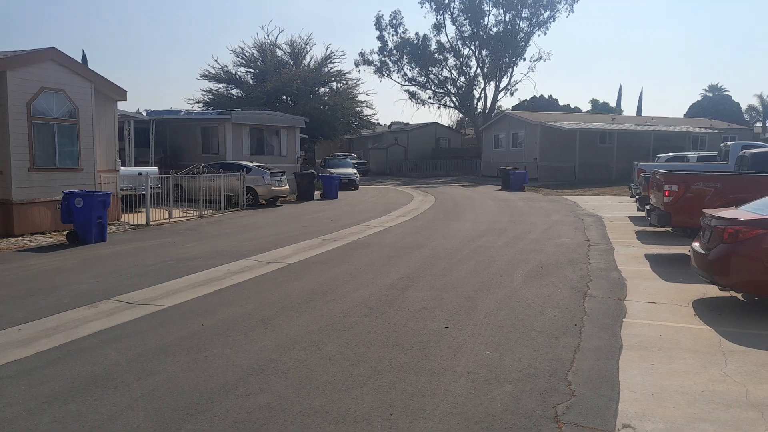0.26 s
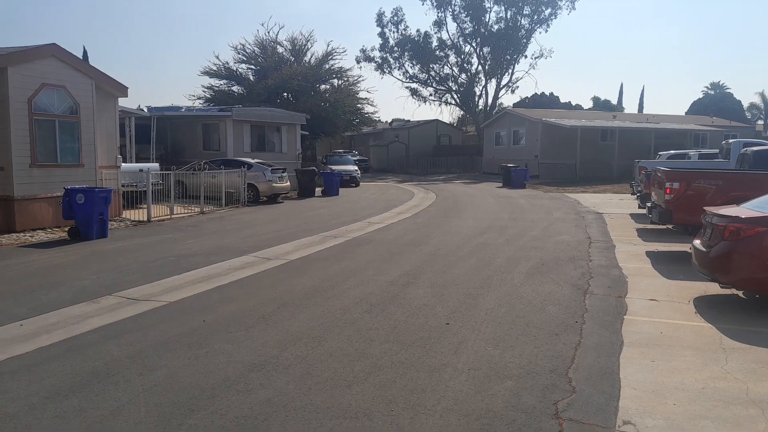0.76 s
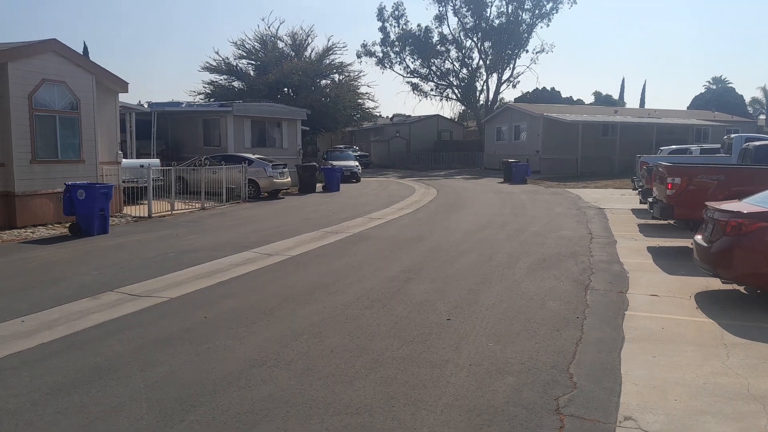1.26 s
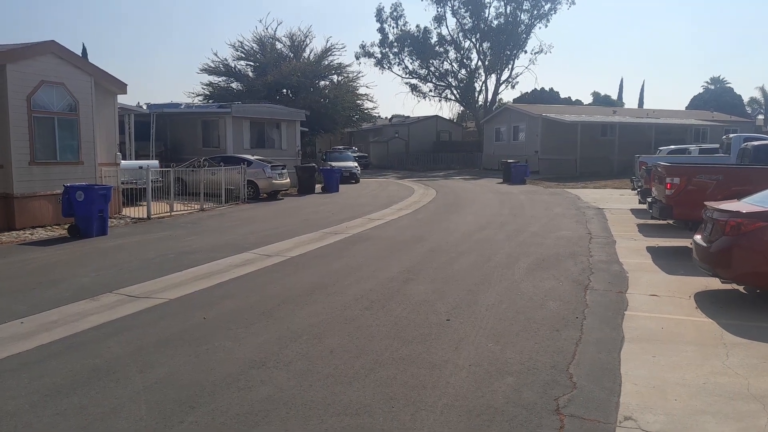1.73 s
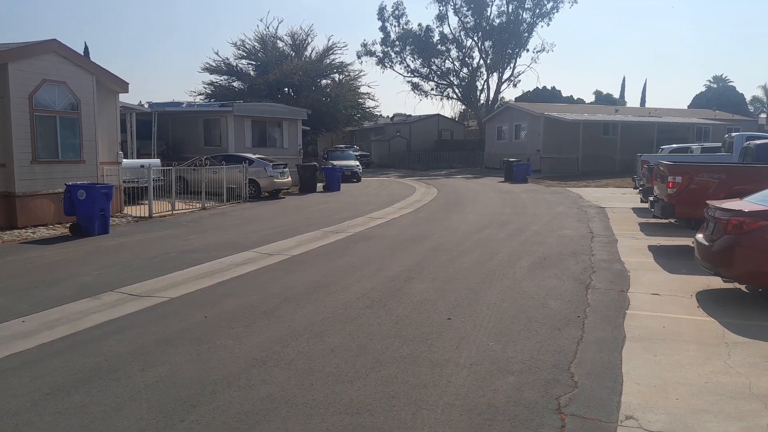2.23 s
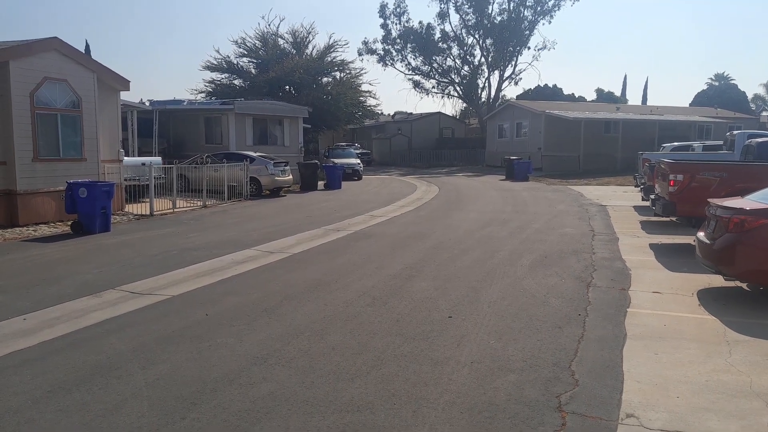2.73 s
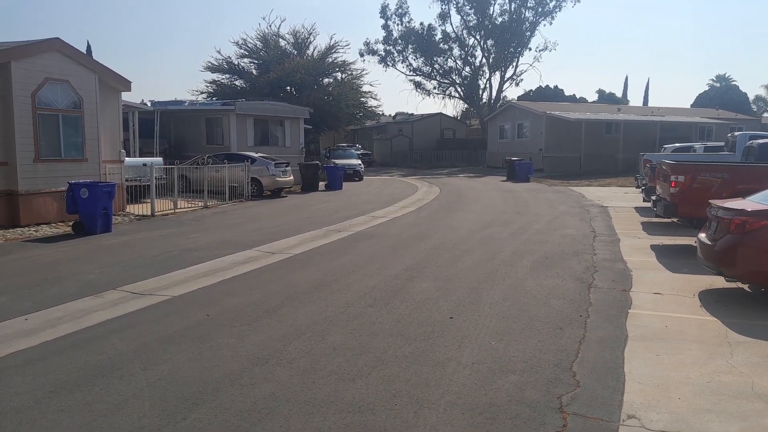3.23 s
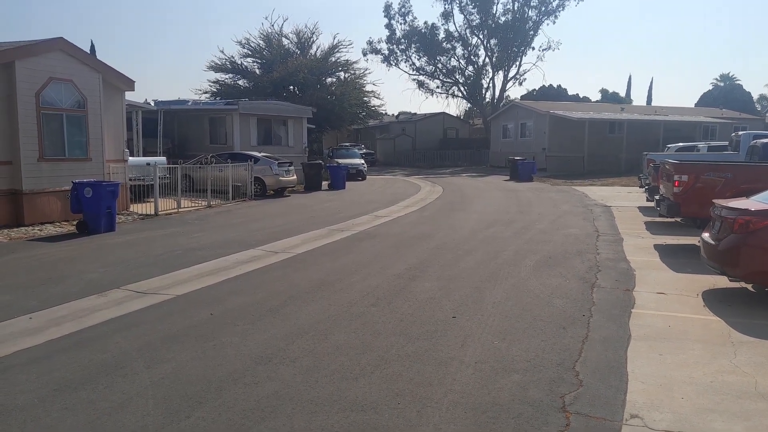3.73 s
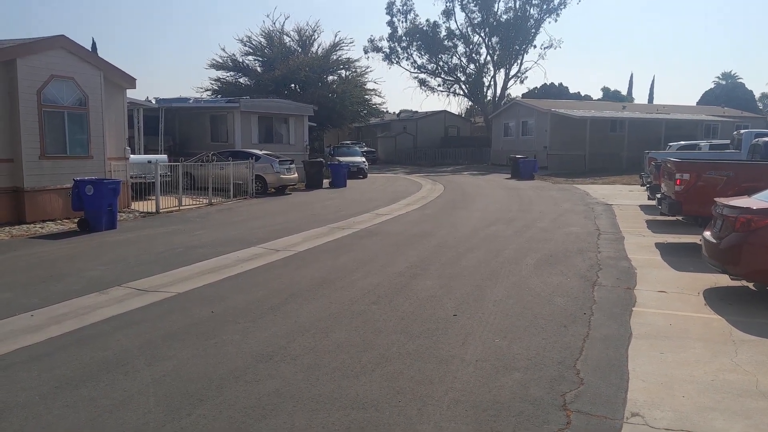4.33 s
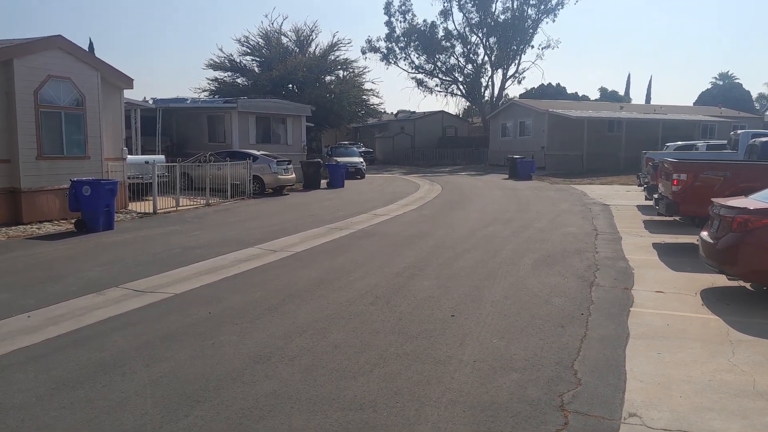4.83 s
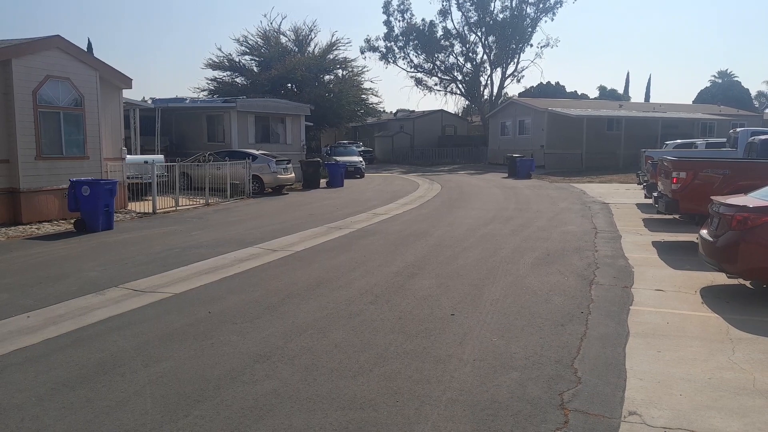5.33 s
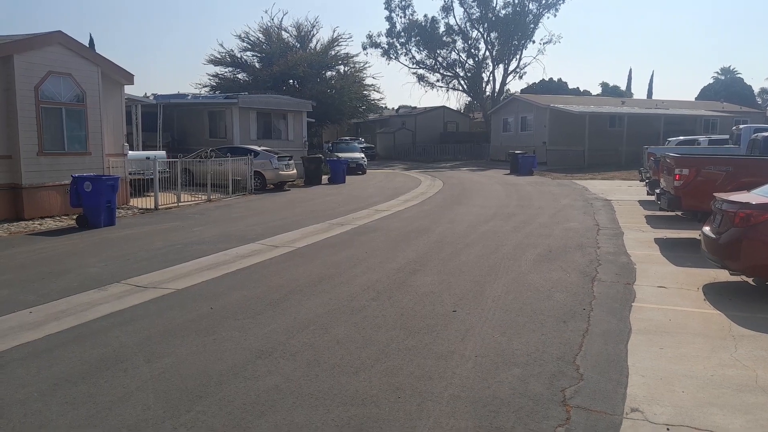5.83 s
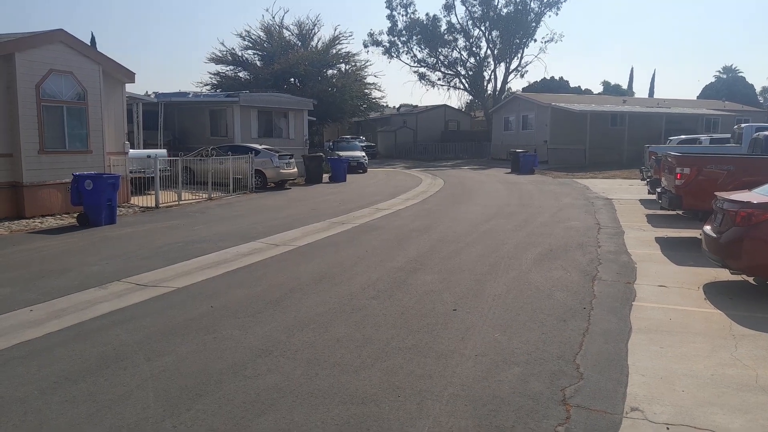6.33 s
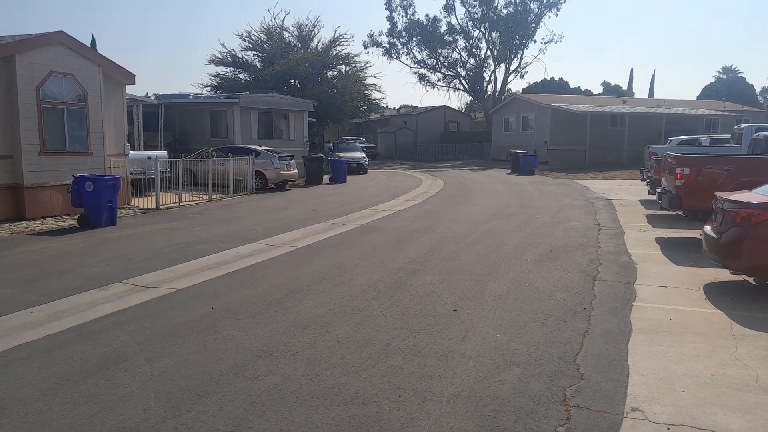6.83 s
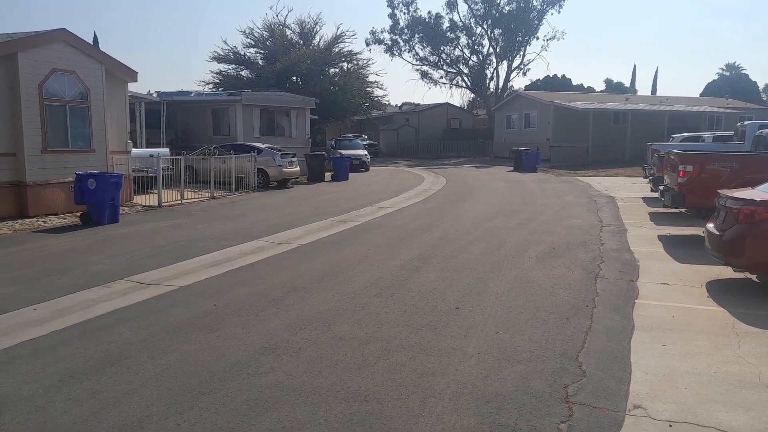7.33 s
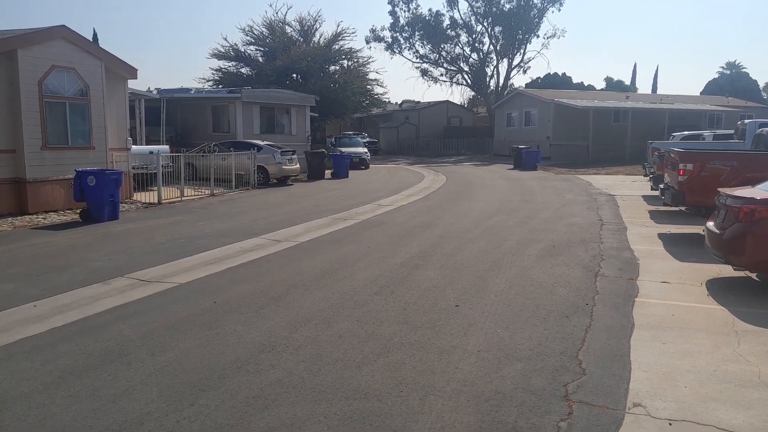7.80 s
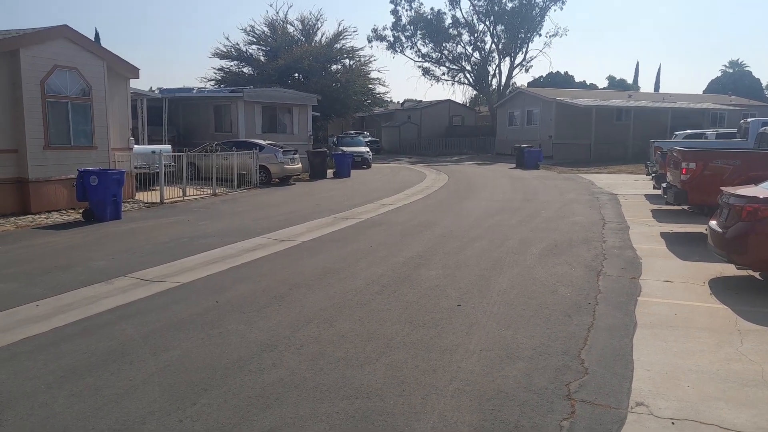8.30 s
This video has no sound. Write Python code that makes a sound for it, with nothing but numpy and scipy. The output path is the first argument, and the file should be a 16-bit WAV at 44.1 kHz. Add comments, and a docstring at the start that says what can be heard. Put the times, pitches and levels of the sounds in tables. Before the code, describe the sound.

On a quiet residential street, a heavy diesel truck drones some distance away, low and throbbing with clatter, fan hum and faint high squeals. Its pitch sags until 0.6 seconds, then revs up to a peak near 1.3. From 1.3 to about 2.1 a loud two-tone horn, a minor third apart, stutters seven toots about 0.12 seconds apart, buzzy and echoing from house fronts; a thin squeal near 2 kHz accompanies it. The engine coasts down to a chugging low around 2.6, then pulls up sharply by 3.0 and holds. Close, soft scuffs and gritty rustles appear around 0.5, 1.1 and 2.5 to 4.5. After 4.2 the truck turns and leaves, rumble and hiss easing while engine pitch and gear whine climb steadily to the end at 8.6. Small birds chirp from 4.8 onward, with a tiny squeal and scuff near 8.1.

```python
"""A diesel drones some way down a residential street while brakes squeal thinly: a refuse truck revs once,
coasts down, then pulls away, turns and gathers speed. Tones and noise locked to the firing phase make its
exhaust, fan and clatter; narrow noise bands make gears, turbo whine and squeals. A two-tone horn of wavering
partials stutters seven times between the houses. Close by, shaped noise makes a few soft scuffs; small birds
chirp in sliding noise bands."""
import sys
import numpy as np
from scipy import signal
from scipy.fft import rfft, irfft, next_fast_len
from scipy.io import wavfile
from scipy.ndimage import uniform_filter1d, map_coordinates

SR = 44100
rng = np.random.default_rng(int(sys.argv[2]) if len(sys.argv) > 2 else 0)


def store_wav(level_fs):
    """Save 16-bit WAV to argv[1]."""
    pcm = np.round(np.clip(np.atleast_2d(level_fs), -1, 1) * 32767)
    wavfile.write(sys.argv[1], SR, pcm.T.astype(np.int16))


N = 377496
TIME = np.arange(N) / SR

# horn toots: start [t/s], relative level [dB]
HORN_TOOTS = [(1.297, 2), (1.416, 1.5), (1.534, 1), (1.653, 1.5), (1.772, 0.5), (1.889, 2), (2.009, 1)]
# horn's upper partials, also the spectrum of its noise: [f/Hz], level before trim [dB]
HORN_BUZZ = [(3600, -53), (5000, -56.5), (6000, -63.5), (6800, -70), (9500, -67), (11500, -78),
             (13500, -75), (15700, -79)]


def amp(db):
    """Decibels to gain."""
    return 10 ** (np.asarray(db) / 20)


def unit(x):
    """Scale to rms 1."""
    return x / np.sqrt(np.mean(x ** 2) + 1e-20)


def along(points, hz):
    """Interpolate (f/Hz, value) points on a log frequency axis."""
    f, v = np.transpose(points)
    return np.interp(np.log(hz + 1), np.log(f + 1), v)


def curves(rows):
    """One value per sample for each column after the time."""
    s, *cols = np.transpose(rows)
    return [np.interp(TIME, s, c) for c in cols]


def wobble(rate_hz, size=N):
    """A smooth random curve, rate_hz knots a second."""
    steps = np.arange(0, size * rate_hz / SR + 1, 1 / 10)
    knots = rng.standard_normal(int(steps[-1]) + 3)
    return np.interp(TIME[:size] * rate_hz, steps, map_coordinates(knots, [steps]))


def swell(peak_s, half_s):
    """A bell of height 1 around a moment."""
    return np.exp(-((TIME - peak_s) / half_s) ** 2)


def later(x, delay_s):
    """x after a delay."""
    return np.roll(x, int(max(delay_s, 0) * SR), axis=-1)


def filtered(x, response):
    """x times a response of frequency."""
    m = next_fast_len(N + SR // 2)
    return irfft(rfft(x, m) * response(np.fft.rfftfreq(m, 1 / SR)), m)[..., :N]


def angle(hz):
    """Running phase of a frequency curve."""
    return 2 * np.pi * np.cumsum(hz) / SR


def tone(phase):
    """A sine of rms 1 at a random starting phase."""
    return np.sqrt(2) * np.sin(phase + rng.uniform(0, 2 * np.pi))


def fuzzy(hz, width_hz):
    """A narrow stereo noise band of rms 1 around a moving pitch."""
    smooth = signal.butter(2, width_hz / 2, fs=SR, output="sos")
    a, b = signal.sosfilt(smooth, rng.standard_normal((2, 2, len(hz))))
    return unit(a * np.cos(angle(hz)) + b * np.sin(angle(hz)))


def glides(rows, width_hz):
    """Short whistles that swell, slide in pitch and fade."""
    out = np.zeros((2, N + SR))
    for s, length_s, start_hz, end_hz, db in rows:
        u = np.linspace(0, 1, int(length_s * SR))
        band = fuzzy(start_hz + (end_hz - start_hz) * u, width_hz)
        out[:, int(s * SR):][:, :len(u)] += amp(db + 6) * np.sin(np.pi * u) * band
    return out[:, :N]


def rush(spectrum):
    """Stereo noise of rms 1; the sides grow less alike in the treble and mostly lean left."""
    # [f/Hz], left-right correlation [1]
    alike = [(60, 0.93), (290, 0.99), (640, 0.71), (1400, 0.47), (3100, 0.34), (6800, 0.041)]
    # [f/Hz], left minus right [dB]
    side_lean = [(60, -1), (110, 1.5), (200, 0.5), (380, 1.5), (700, 3.5), (1290, 5), (2380, 3), (4400, 1),
                 (8120, -2.5), (15000, 0.5)]
    m = next_fast_len(N, real=True)
    hz = np.fft.rfftfreq(m, 1 / SR)
    turn = np.arccos(np.clip(along(alike, hz), -1, 1)) / 2
    shaped = rfft(rng.standard_normal((2, m))) * amp(along(spectrum, hz))
    mid, side = shaped * [np.cos(turn), np.sin(turn)]
    lean = amp(along(side_lean, hz) / 2)
    return unit(irfft([(mid + side) * lean, (mid - side) / lean], m)[:, :N])


def throb(phase, depth):
    """A gain of rms 1 that peaks once a cycle."""
    return unit(np.exp(depth * np.cos(phase)))


def street(x):
    """Scattered sound from houses and trees; the high treble dies first."""
    # reverberation: [f/Hz], t60 [s]
    decay = [(200, 1.6), (1500, 0.59), (2400, 1.1), (2900, 1.35), (4000, 0.31), (6000, 0.13),
             (12000, 0.038)]
    hz, t, z = signal.stft(rng.standard_normal((2, SR)), SR, nperseg=256)
    t60_s = np.maximum(along(decay, hz), .02)[:, None]
    tail = signal.istft(z * amp(-60 * t / t60_s), SR, nperseg=256)[1]
    return signal.fftconvolve(x, tail / np.linalg.norm(tail[0]), axes=1)[:, :N]


def air():
    """The quiet air of the street: steady shaped noise."""
    # [f/Hz], relative density [dB per Hz]
    spectrum = [(30, 18.5), (200, 21.5), (1000, 15.5), (4000, 7), (7000, 4), (11000, -5.5), (15700, -6)]
    return amp(-65.0) * rush(spectrum)


def birds():
    """Chirps as sliding noise bands, with their scatter from the street."""
    # start [t/s], length [s], start and end [f/Hz], level 6 dB under mid-glide [dB]
    chirps = [(4.76, 0.056, 4600, 3806, -77), (5.03, .11, 4200, 2614, -68), (5.41, 0.11, 3995, 3900, -71.5),
              (5.44, 0.15, 4670, 4030, -68), (5.54, .11, 3880, 2770, -65.5),
              (5.73, 0.059, 5396, 4907, -73.5), (6.04, 0.075, 3920, 3195, -67.5),
              (6.29, .03, 5200, 4240, -67), (6.9, 0.065, 4415, 3062, -66), (6.93, 0.08, 4270, 2955, -67),
              (7.17, .07, 3892, 3300, -69.5), (7.32, 0.086, 5520, 5020, -71), (8.38, .11, 3800, 2762, -64),
              (8.48, 0.067, 3593, 3883, -65)]
    calls = glides(chirps, width_hz=320)
    return calls + amp(-8.0) * street(calls)


def coasting():
    """1 while the foot is off the pedal, 0 under power."""
    # foot off the pedal: from [t/s], to [t/s]
    spans = [(.37, 0.726), (1.89, 2.66)]
    pedal_s = 0.076  # time to lift or press
    return sum(np.clip(np.minimum(TIME - start, end - TIME) / pedal_s + .5, 0, 1) for start, end in spans)


def pulling(firing_hz):
    """1 while the engine climbs hard from idle, 0 at steady speed."""
    full_pull_hz_per_s, ends_hz, fade_hz = 30, 57.8, 6
    climb_hz_per_s = uniform_filter1d(np.gradient(firing_hz) * SR, size=SR // 8)
    return np.clip(climb_hz_per_s / full_pull_hz_per_s, 0, 1) * np.clip((ends_hz - firing_hz) / fade_hz, 0, 1)


def level(law, firing_hz):
    """A layer's dB: it rises with speed, shifts with coasting or pulling and falls as the truck leaves."""
    # the truck turns and leaves: [t/s], level [dB]
    leaving = [(4.2, 2), (4.75, -4), (6.3, -7), (8.56, -10)]
    cruise_hz = 60  # firing rate
    cruise_db, octave_db, share, coast_db, pull_db = law
    away_db, = curves(leaving)
    effort_db = coast_db * coasting() + pull_db * pulling(firing_hz)
    return cruise_db + octave_db * np.log2(firing_hz / cruise_hz) + share * away_db + effort_db


def hiss_and_rustles(firing_hz):
    """The engine's airy hiss and soft gritty rustles: one noise whose powers add."""
    # cruise level before trim [dB], slope [dB/octave of speed], share of leaving loss [1],
    # coasting [dB], pulling [dB]
    law = (-61.5, 22.5, 1.44, -0.5, 0.5)
    # peak [t/s], half length [s], level before trim [dB]
    rustles = [(0.315, 0.031, -66), (.555, 0.04, -58), (1.04, 0.05, -57), (2.84, .035, -57.5),
               (3.173, 0.04, -62.5), (3.275, .055, -50.5), (3.417, 0.043, -55.5), (3.67, 0.024, -47),
               (3.817, 0.048, -54.5), (4.03, 0.076, -52), (4.149, .04, -52.5)]
    # [f/Hz], relative density [dB per Hz]
    spectrum = [(500, -18), (1200, -3.5), (1450, -0.5), (1850, 6.5), (2200, -0.5), (2550, 1.5),
                (2900, -2.5), (3300, 0.5), (4200, -5.5), (5700, -7), (6800, -22.5), (9000, -26),
                (15000, -38)]
    hiss_power = amp(level(law, firing_hz)) ** 2
    rustle_power = sum((amp(db) * swell(s, half_s)) ** 2 for s, half_s, db in rustles)
    trim_db, flutter_db = 4.5, 1.2 * wobble(60)
    return np.sqrt(hiss_power + rustle_power) * amp(trim_db + flutter_db) * rush(spectrum)


def scuffs():
    """Brief scrapes: grainy band noise under short strokes."""
    # peak [t/s], half length [s], low and high edge [f/Hz], peak level [dB]
    strokes = [(0.55, .018, 2220, 5600, -49), (1.191, 0.013, 2590, 6380, -49.5),
               (2.518, 0.016, 5500, 7300, -59), (2.826, .011, 2500, 6000, -46),
               (3.374, 0.086, 3780, 7500, -58.5), (3.676, 0.018, 2680, 6400, -45),
               (3.802, .012, 2960, 6940, -60), (4.529, .016, 2890, 6061, -54),
               (8.149, .014, 4623, 11600, -65.5)]
    out = np.zeros((2, N))
    n = SR // 2
    hz, t = np.fft.rfftfreq(n, 1 / SR), TIME[:n] - TIME[n // 2]
    for s, half_s, low_hz, high_hz, db in strokes:
        grit = rng.standard_normal((2, n)) * amp(4 * wobble(700, size=n))
        highpass = 1 - 1 / (1 + (hz / low_hz) ** 6)
        lowpass = amp(-27.5) + 1 / (1 + (hz / high_hz) ** 10)  # finest grit reaches above the band
        stroke = amp(db) * np.hanning(n) / (1 + (t / half_s) ** 2)
        out[:, int(s * SR) - n // 2:][:, :n] += stroke * unit(irfft(rfft(grit) * highpass * lowpass, n))
    return out


def swing(t, lag_s, rise_s, hold_s, t60_s):
    """How far the horn diaphragms swing: up while the current is on, then ringing down."""
    total = 0
    for s, db in HORN_TOOTS:
        age_s = np.maximum(t - s - lag_s, 0)
        ring_db = -60 * np.maximum(age_s - hold_s, 0) / t60_s
        total = total + amp(db + ring_db) * (1 - np.exp(-(age_s / rise_s) ** 2))
    return total


def diaphragm(pitch_hz, partials, body, edge, count=32):
    """One horn: strong low partials from its trumpet, and a buzz once the swing is full."""
    # phase lead of the left side: [f/Hz], [rad]
    left_lead = [(400, 1), (810, 0.84), (970, -2.2), (1450, -1.44), (1940, -2.25), (2430, 0.68),
                 (2900, -1.6)]
    n = len(body)
    phase = angle(pitch_hz * (1 + .003 * wobble(60, size=n)))
    out = np.zeros((2, n))
    for k, (_, left_db, right_db, lag_s) in enumerate(partials, 1):
        start = k * phase + rng.uniform(0, 2 * np.pi)
        size = np.sqrt(2) * later(body, lag_s) * amp(1.2 * wobble(26, size=n))
        # reflections put the two sides out of step
        left = amp(left_db) * np.sin(start + along(left_lead, k * pitch_hz))
        out += size * [left, amp(right_db) * np.sin(start)]
    for k in range(len(partials) + 1, count + 1):
        flutter_db = rng.normal(0, 2, (2, 1)) + 3 * wobble(25, size=n)
        gain = amp(along(HORN_BUZZ, k * pitch_hz) - 1.5 + flutter_db)
        out += edge * gain * [tone(k * phase), tone(k * phase)]
    return out


def horn():
    """Two horns a minor third apart, switched on and off together, answered by the house fronts."""
    # strong partials of each horn: harmonic [1], left and right level before trim [dB],
    # lag of strongest path [s]
    low_partials = [(1, -42.5, -50.5, 0.0021), (2, -27.5, -33.5, 0.0067), (3, -27, -35, 0.024),
                    (4, -29.5, -30.5, 0.0047), (5, -42, -41.5, 0.0026), (6, -33.5, -36, 0.011),
                    (7, -65, -49, 0.014), (8, -48, -58, 0.014)]
    high_partials = [(1, -61, -41, 0.0011), (2, -40, -27.5, 0.0072), (3, -29, -27, 0.0072),
                     (4, -34.5, -42, 0.021), (5, -36, -41, 0.01), (6, -40.5, -43, 0.02),
                     (7, -47.5, -50, 0.024), (8, -61, -59, 0.013)]
    # house fronts: echo delay [s], level [dB]
    walls = [(.097, -16), (.18, -31), (.275, -36)]
    live = (TIME > HORN_TOOTS[0][0]) & (TIME < HORN_TOOTS[-1][0] + .5)
    body = swing(TIME[live], lag_s=-0.00071, rise_s=0.011, hold_s=0.047, t60_s=.11)
    edge = swing(TIME[live], lag_s=0.0042, rise_s=0.023, hold_s=0.042, t60_s=0.21)
    low = diaphragm(405.5, low_partials, body, edge)
    high = diaphragm(485.1, high_partials, body, edge)
    direct = np.zeros((2, N))
    direct[:, live] = amp(-2.0) * (low + high)
    direct[:, live] += amp(-50.5) * edge * rush(HORN_BUZZ)[:, live]
    # echoes come back duller, from the opposite side
    echoes = sum(amp(db) * later(direct[::-1], delay_s) for delay_s, db in walls)
    dull_echoes = filtered(echoes, lambda hz: 1 / (1 + (hz / 3800) ** 4))
    return direct + dull_echoes + amp(-18) * street(direct)


def squeals():
    """Thin squeals of brakes and pump: narrow gliding noise bands."""
    # start [t/s], length [s], start and end [f/Hz], level 6 dB under mid-glide [dB]
    rows = [(0, 1.18, 1992, 1960, -69), (.08, 0.37, 13400, 12900, -74.5), (.29, 0.27, 12400, 12250, -79),
            (.58, 0.42, 8307, 8270, -76.5), (1.2, 1.1, 2002, 2018, -50), (8.12, 0.061, 1859, 1868, -53),
            (8.37, 0.18, 5210, 5200, -70)]
    return glides(rows, width_hz=31)


def drivetrain(firing, firing_hz):
    """Fan and gears turn with the crank; the turbo follows the exhaust flow."""
    # gear whine: [t/s], level per gear before trim [dB]
    gear_levels = [(0, -85), (4.5, -83), (5.2, -69), (6.6, -63), (7.5, -65.5), (8.56, -69.5)]
    # turbo whistle: [t/s], [f/Hz]
    turbo_pitch = [(0, 7090), (.5, 6114), (.9, 5800), (1.3, 6140), (1.9, 6120), (2.65, 5110), (3.3, 5910),
                   (4.4, 6658), (5.05, 6930), (5.5, 7990), (6.6, 9687)]
    # cowling resonances that the fan's hum passes through: [f/Hz], level [dB]
    cowling = [(195, -62), (213, -43.5), (230, -47.5), (244, -38), (270, -43), (293, -48.5), (309, -41.5),
               (328, -46)]
    # intake, which lets the low turbo whistle out best: [f/Hz], level [dB]
    intake = [(5200, -63.5), (5850, -66), (6250, -70), (6650, -79.5), (7000, -77.5), (8000, -79.5),
              (9000, -85), (9600, -92.5)]
    # second whistle climbing at speed: start [t/s], length [s], start and end [f/Hz],
    # level 6 dB under mid-glide [dB]
    second_whistle = [(7.05, 2.3, 7030, 9000, -86)]
    gear_db, = curves(gear_levels)
    turbo_hz, = curves(turbo_pitch)
    fan_order, gear_orders = 3.87, (22.8, 25.4)  # multiples of the firing rate
    blades = tone(fan_order * firing + .2 * wobble(14))
    fan = amp(along(cowling, fan_order * firing_hz) + 2.2 * wobble(8.1)) * blades
    gears = sum(amp(gear_db + 1.0 + 1.7 * wobble(13.0)) * fuzzy(order * firing_hz, width_hz=22)
                for order in gear_orders)
    turbo_coast_db = -14.5  # without exhaust flow the whistle fades
    turbo_db = along(intake, turbo_hz) + turbo_coast_db * coasting() + 1.3 * wobble(7.3)
    turbo = amp(turbo_db) * fuzzy(turbo_hz, width_hz=340)
    return fan + gears + turbo + glides(second_whistle, width_hz=430)


def exhaust_level(firing_hz, coast_db):
    """The note's dB: the pipe's resonances, more when pulling up from idle, less with the fuel cut."""
    # pipe resonances: firing rate [f/Hz], level before side gain [dB]
    pipe = [(42, -36.5), (47, -37), (51, -33), (54, -28), (57.5, -22.5), (60, -23.5), (64, -17), (70, -19),
            (76, -25), (79.5, -26.5), (81.5, -24.5), (86, -22)]
    pull_db = 6
    return along(pipe, firing_hz) + pull_db * pulling(firing_hz) + coast_db * coasting()


def boom(hz):
    """The muffler's resonant boost in dB at a frequency."""
    # centre [f/Hz], half width [Hz], boost [dB]
    resonances = [(234, 7, 5.5)]
    return sum(db / (1 + ((hz - centre) / width) ** 2) for centre, width, db in resonances)


def engine(firing, firing_hz):
    """Each firing pushes the exhaust note, puffs gas through the muffler and rattles the block."""
    # engine surges: peak [t/s], half length [s], change of clatter, rumble, exhaust note [dB]
    surges = [(0.313, .04, 6, 0.5, 4), (0.961, 0.029, 1, 4, 8.5), (1.125, 0.13, 3.5, 1.5, 2.5),
              (3.288, 0.06, 4, -0.5, 0.5), (3.62, .2, 0.5, -0.5, 1), (4.065, 0.13, 4.5, 2, 1),
              (5, 0.21, 1, 3.5, -0.5), (5.45, 0.057, -1, 3.5, 1)]
    # laws: cruise level (clatter before trim) [dB], slope [dB/octave of speed],
    # share of leaving loss [1], coasting [dB], pulling [dB]
    rumble_law = (-36, 20, 0.97, -1, -1.5)
    clatter_law = (-51.5, 18, 1, -0.5, 0.5)
    # spectra: [f/Hz], relative density [dB per Hz]
    rumble_spectrum = [(25, -27), (45, -4), (75, 4.5), (115, 1), (160, -1), (203, -3.5), (238, 2),
                       (275, -6.5), (320, -6.5), (400, -14), (500, -28.5), (800, -51), (2000, -100)]
    clatter_spectrum = [(200, -25), (430, -7), (505, -9), (585, 2), (690, -0.5), (850, -2.5), (1100, -8),
                        (1400, -13), (1800, -4.5), (2200, -16), (2550, -11), (2900, -31.5), (3500, -33),
                        (8000, -45.5)]
    # overtones: multiple of firing rate [1], level re rumble before side gain [dB]
    orders = [(1.5, -14), (2, -13.5), (2.5, -12), (3, -13)]
    # body drumming in the turn: start [t/s], length [s], start and end [f/Hz],
    # level 6 dB under mid-glide [dB]
    drumming = [(3.75, 2, 155.3, 160.1, -42.5)]
    clatter_db, rumble_db, note_db = sum(np.outer(dbs, swell(s, half_s)) for s, half_s, *dbs in surges)
    clatter_db = clatter_db + level(clatter_law, firing_hz)
    rumble_db = rumble_db + level(rumble_law, firing_hz)
    note_db = note_db + exhaust_level(firing_hz, coast_db=-11)
    # unequal cylinders add unsteady half orders; near idle they chug most and the note stumbles
    idle = np.clip((56 - firing_hz) / 12, 0, 1)
    chug_db, stumble_db = 5 * idle, 6.6 * idle * wobble(20)
    overtones = 0
    for order, db in orders:
        order_db = rumble_db + chug_db + db + boom(order * firing_hz) + 3.8 * wobble(11)
        overtones = overtones + amp(order_db) * tone(order * firing + .6 * wobble(12))
    note = amp(note_db + stumble_db + 0.25 * wobble(18)) * tone(firing)
    rumble = amp(rumble_db) * rush(rumble_spectrum) * throb(firing, depth=0.3)
    rattle = rush(clatter_spectrum) * throb(firing, depth=0.088)
    clatter = amp(clatter_db + 2.5 + 0.92 * wobble(20)) * rattle
    side_gain = amp([[.45], [-.45]])  # left, right
    body = glides(drumming, width_hz=37.5)[0]  # same on both sides
    return (note + overtones) * side_gain + rumble + clatter + body


def scene():
    """Truck, horn, scuffs, birds and the quiet air of the street."""
    # engine speed: [t/s], firing rate [f/Hz]
    speed = [(0.0, 50.85), (0.62, 42.76), (0.98, 50.88), (1.28, 60.97), (1.55, 59), (1.85, 54.4),
             (2.3, 43.86), (2.64, 41.9), (3.02, 58.68), (3.2, 59.8), (3.75, 59.18), (5.03, 63.47),
             (5.42, 69.8), (5.8, 71), (6.5, 76.03), (7.1, 79.75), (8.1, 86.43), (8.56, 89.34)]
    firing_hz, = curves(speed)
    firing = angle(firing_hz * (1 + 0.0024 * wobble(12)))
    background = air() + birds() + hiss_and_rustles(firing_hz) + scuffs()
    truck = squeals() + drivetrain(firing, firing_hz) + engine(firing, firing_hz)
    return background + horn() + truck


def record(dry):
    """A steep low-pass sets the band limit; the ends are faded over 3 ms beforehand."""
    top_hz = 15720
    fade = np.clip(np.minimum(TIME, TIME[-1] - TIME) / .003, 0, 1)
    return signal.sosfilt(signal.ellip(14, .05, 100, top_hz, fs=SR, output="sos"), dry * fade)


dry = scene()
out = record(dry)
store_wav(out)
```